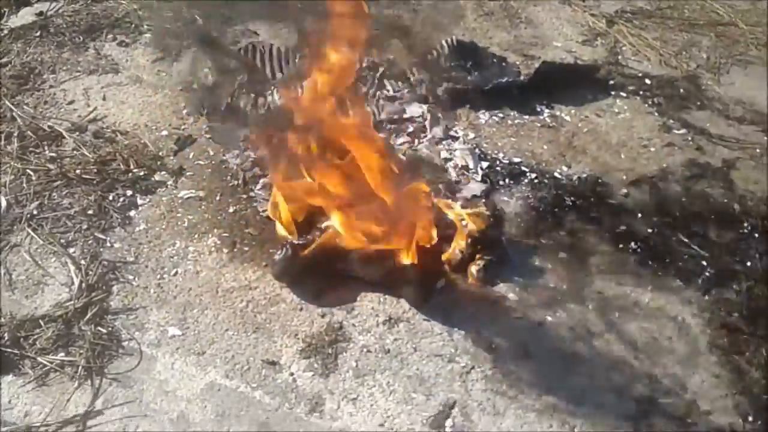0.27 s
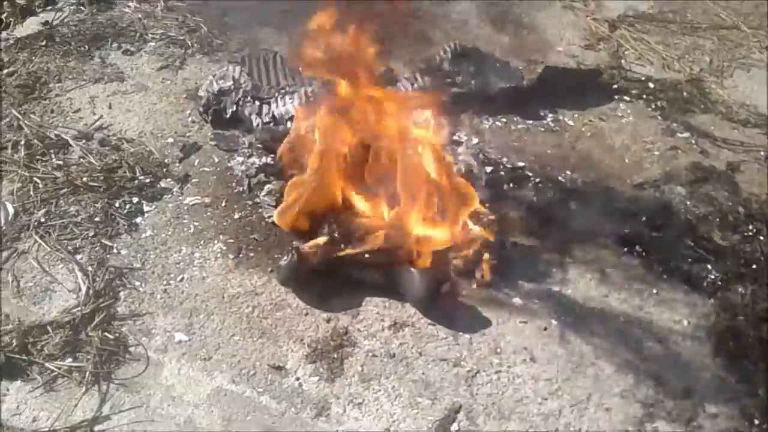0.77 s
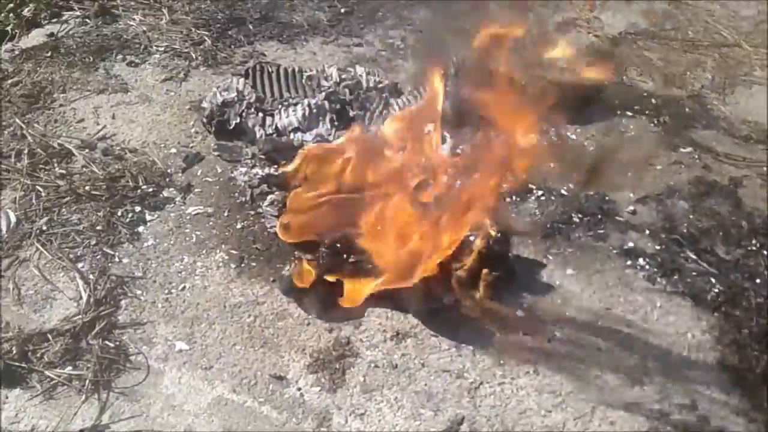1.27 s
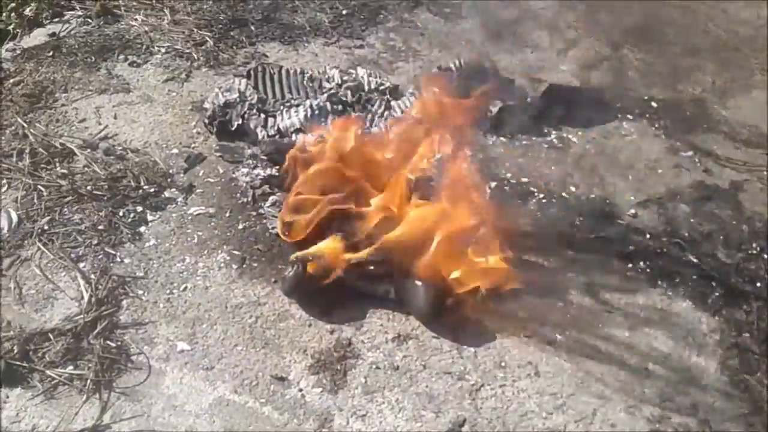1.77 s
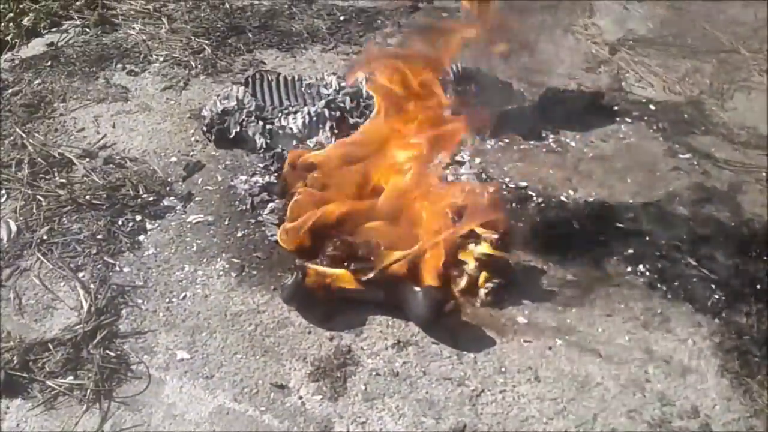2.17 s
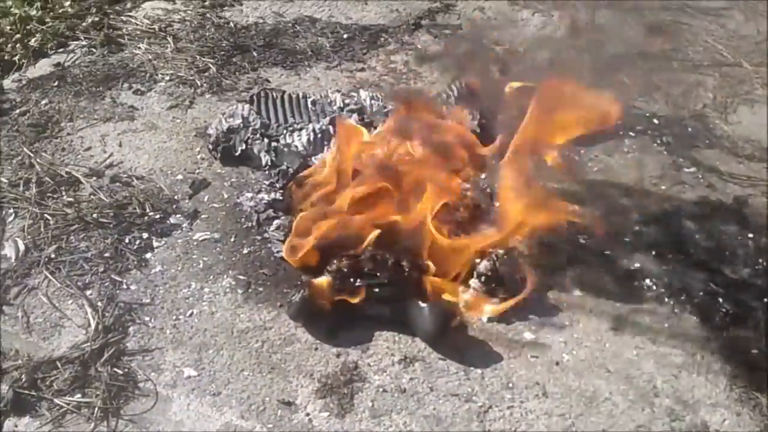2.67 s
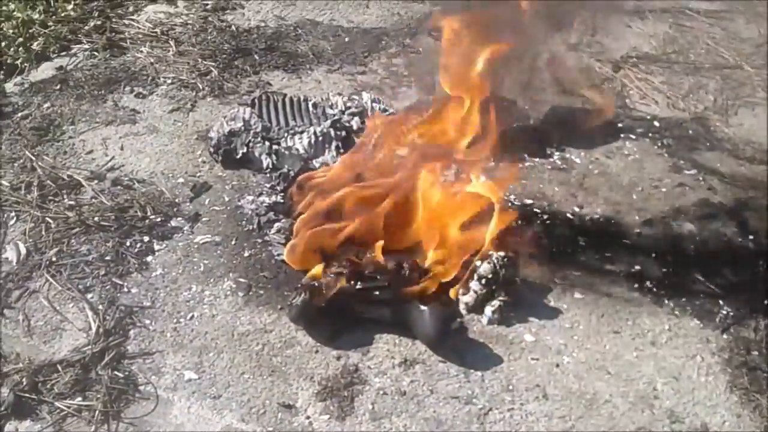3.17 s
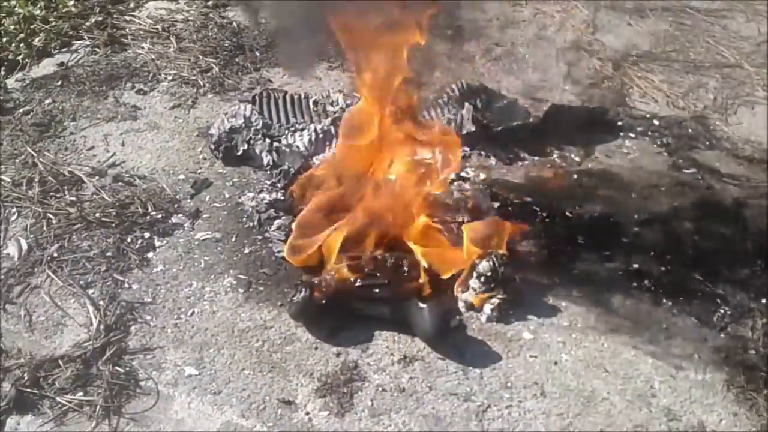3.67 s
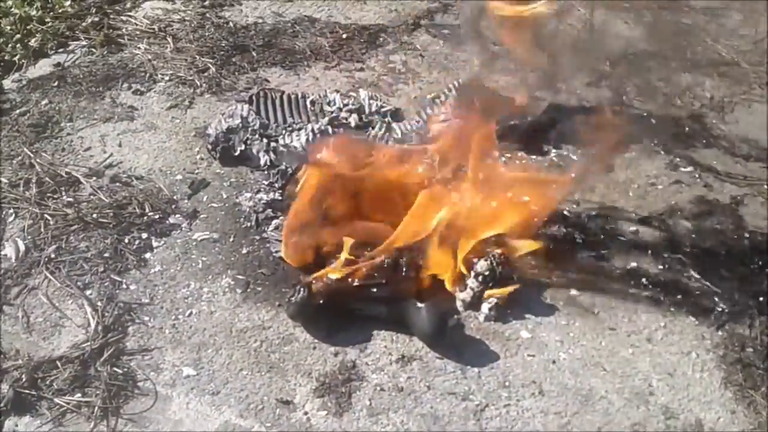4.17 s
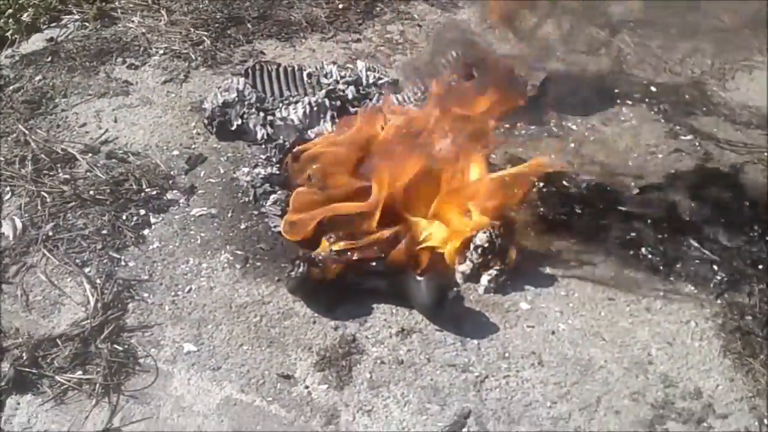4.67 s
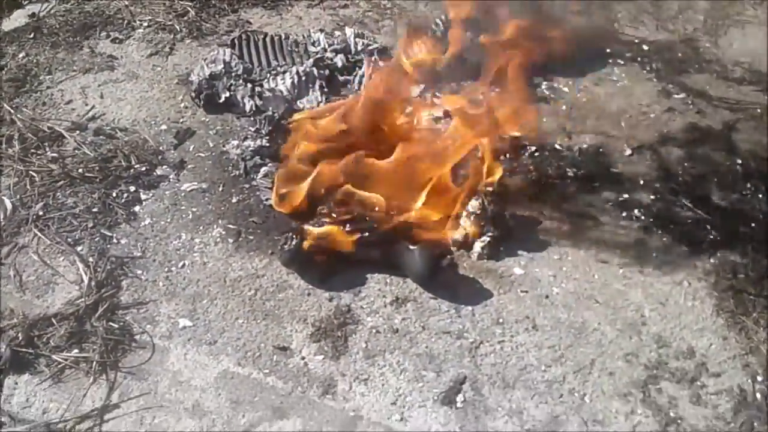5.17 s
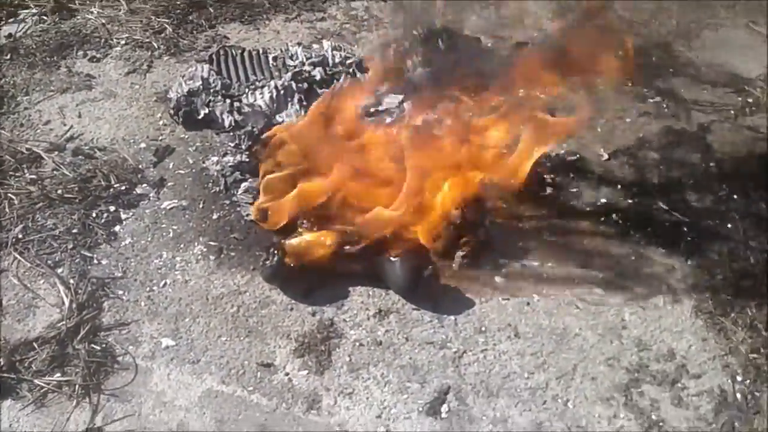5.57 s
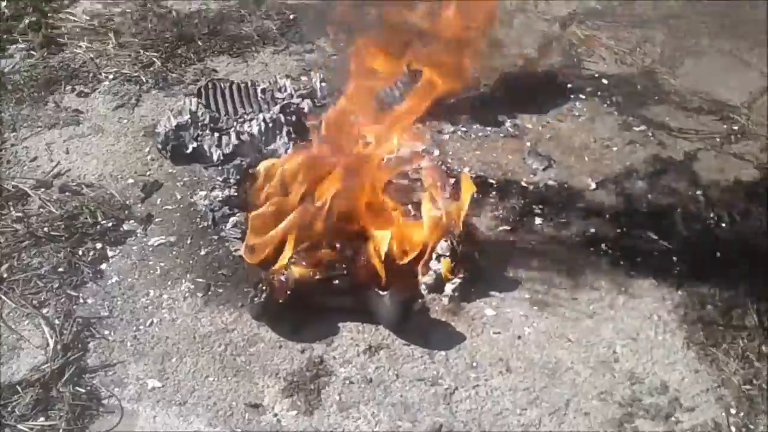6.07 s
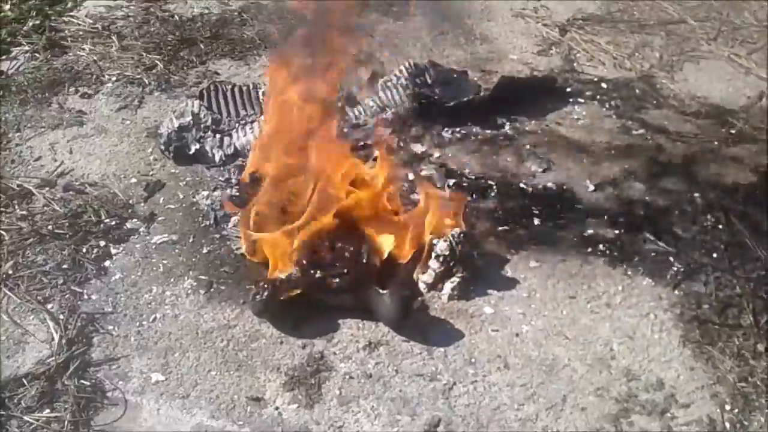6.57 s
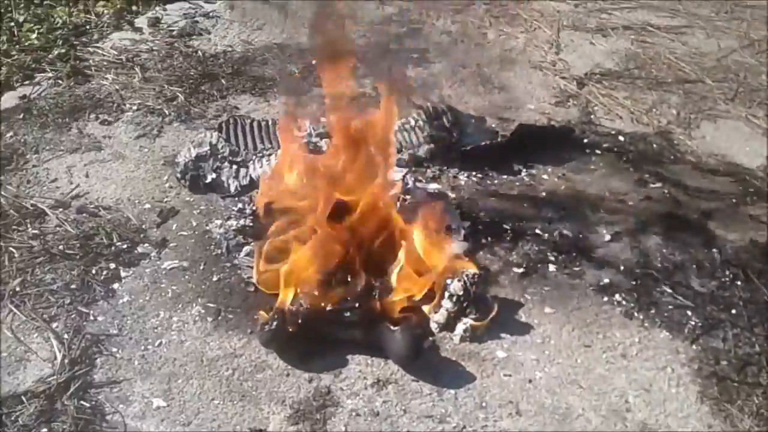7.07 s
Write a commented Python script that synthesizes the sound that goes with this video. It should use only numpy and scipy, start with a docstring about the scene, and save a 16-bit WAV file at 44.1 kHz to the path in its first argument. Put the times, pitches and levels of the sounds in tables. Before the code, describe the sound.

A small fire of paper and cardboard burns on concrete outdoors, close to the microphone and centred. Throughout, flames make a low, softly fluttering rumble with muffled patter, while faint air and a low, wavering hum of far machines sit behind; the hum's lowest notes fade. At 0 s bright ticks and fine fizz are lively, with small snaps, then thin out by 0.5 s, with a tiny high squeak. From 1 to 1.8 s it is sparse. At 1.84 s a sharp snap squeaks, and at 2.04 s one very loud crack stands out, with a dull puff. Crackling spurts at 2.6 s, a strong snap follows at 3.03 s, and fizz swells at 3.6 s. Frequent snaps continue through 4.4 s, easing around 5.5 s. Two hard pops at 6.03 s lead into the densest crackle, peaking near 6.45 s; scattered snapping and sizzling continue to 7.3 s.

```python
"""Outdoors on concrete, a small fire of paper and cardboard burns close to the listener.
Breaking fibres give showers of tiny damped ticks over a sizzle of dense random clicks, both filtered to shape;
the burn dies down, spurts as fresh edges catch, and builds again. Sharp pops are larger snaps with rustle and
knock, dull ones are tones falling in pitch, and brief squeaks are pure tones. The flames are low noise with a
fluttering level and a patter of clicks; far machines hum as slowly wavering sines in faint outdoor air."""
import sys
import numpy as np
from scipy import signal
from scipy.fft import rfft, irfft
from scipy.io import wavfile
from scipy.ndimage import uniform_filter1d

SR = 44100
rng = np.random.default_rng(int(sys.argv[2]) if len(sys.argv) > 2 else 0)


def generate_wav(signal):
    """Clip the signal to [-1, 1] and save it as 16-bit WAV at the path in sys.argv[1]."""
    frames = np.transpose(np.atleast_2d(signal))
    scaled = np.clip(frames, -1, 1) * 32767
    pcm = np.round(scaled).astype(np.int16)
    wavfile.write(sys.argv[1], SR, pcm)


N = 323253
TIME = np.arange(N) / SR

# how hard the paper burns, before each layer's trim: [t/s, crackle level/dB, sizzle level/dB]
BURN_STRENGTH = [(0.0, -55, -54.5), (0.42, -66.5, -57), (0.82, -66, -59.5), (1.12, -72, -65),
                 (1.32, -63, -64), (1.55, -75, -64), (1.9, -65, -62), (2.39, -68, -62.5),
                 (2.59, -56.5, -55.5), (2.77, -62, -57), (3.03, -57, -60), (3.38, -67.5, -62.5),
                 (3.59, -57.5, -51.5), (4.12, -55, -55), (4.55, -62, -59), (4.82, -58.5, -58),
                 (5.87, -64, -60.5), (6.07, -57.5, -55.5), (6.44, -51.5, -50.5), (6.65, -59.5, -56),
                 (7.04, -56.5, -57.5), (7.33, -60, -54.5)]


def gain_of(db):
    """Level: an amplitude ratio is ten to the power of dB / 20."""
    return 10 ** (np.asarray(db) / 20)


def evened(x):
    """Normalization: scales the mean power to 1."""
    return x / np.sqrt(np.mean(x ** 2) + 1e-20)


def curve(rows, axis):
    """Linear interpolation: one column of a timed table, at every sample."""
    rows = np.array(rows)
    return np.interp(TIME, rows[:, 0], rows[:, axis])


def add(mix, s, sound):
    """Superposition: adds a sound into the mix, in place, from time s."""
    part = mix[max(round(s * SR), 0):][:len(sound)]
    part += sound[:len(part)]


def drift(hz):
    """Low-passed noise: a slow random course of rms 1, with little variation much faster than hz."""
    spectrum = rfft(rng.standard_normal(N))
    low_pass = 1 / (1 + (np.fft.rfftfreq(N, 1 / SR) / hz) ** 4)
    return evened(irfft(spectrum * low_pass, N))


def ring(points, size=4096):
    """Minimum phase: the causal impulse response whose phase follows from its log spectrum."""
    f, db = np.transpose(points)
    hz = abs(np.fft.fftfreq(size, 1 / SR))
    log_gain = np.log(gain_of(np.interp(np.log(hz + 1), np.log(f), db)))
    return np.fft.ifft(np.exp(np.conj(signal.hilbert(log_gain)))).real


def colour(x, points):
    """Linear filtering: convolution imposes a spectrum on x; the result has rms 1."""
    return evened(signal.oaconvolve(x, ring(points))[:N])


def shower(per_s, spread_db, cap):
    """Poisson-like process: clicks of random sign and moment, most of them small and a few large."""
    size = gain_of(spread_db * np.minimum(rng.exponential(1, N), cap))
    happens = rng.random(N) < per_s / SR
    return size * rng.choice([-1, 1], N) * happens


def outdoor_air(level_db=-69):
    """Broadband ambience: stationary filtered noise, the same in both ears."""
    # spectrum of the air: [f/Hz, level/dB per Hz]
    air_spectrum = [(200, -3.5), (1500, 1), (4000, -10), (8000, -4.5), (11000, -44), (14000, -8.5),
                    (16000, -18)]
    return gain_of(level_db) * colour(rng.standard_normal(N), air_spectrum)


def wide_air(level_db=-75):
    """Interaural difference: filtered noise to be heard in opposite phase by the two ears."""
    # spectrum of the air that differs between the ears: [f/Hz, level/dB per Hz]
    wide_spectrum = [(200, -28), (300, 2.5), (2200, 5), (5000, -3), (9000, -27), (11500, -25),
                     (15000, -4.5)]
    return gain_of(level_db) * colour(rng.standard_normal(N), wide_spectrum)


def hum(waver=0.0022, waver_db=1.3):
    """Frequency and amplitude modulation: far machines hold wavering low notes; all but the highest fade."""
    # notes about which pitch and level waver: [f/Hz, rms level at the start/dB, fade/(dB/s)]
    notes = [(73, -65, 3.0), (119.5, -62, 1.0), (163, -69, 0.5), (236.7, -59.2, 0)]
    clock = np.cumsum(1 + waver * drift(hz=1.95)) / SR  # one pitch waver shared by all notes
    total = np.zeros(N)
    for hz, db, fade in notes:
        level_db = db - fade * TIME + waver_db * drift(hz=0.51)
        total += gain_of(level_db) * np.sqrt(2) * np.sin(2 * np.pi * hz * clock)
    return total


def flames(roar_db=-1, lick_db=1.5, patter_db=-65, follow=0.5, flicker_db=2.04):
    """Combustion noise: turbulent burning roars low; little pockets of gas catch with a soft patter."""
    # size of the flames, before trim and flutter: [t/s, roar level/dB]
    flame_size = [(0.05, -50.5), (0.47, -54), (0.57, -48.5), (0.66, -53), (1.48, -51.5), (1.56, -55.5),
                  (1.8, -51.5), (2.27, -56), (2.44, -53.5), (4.55, -53.5), (4.7, -56), (5.06, -52),
                  (5.3, -53.5), (5.66, -51.5), (5.87, -56), (6.15, -54), (6.6, -52.5), (7.33, -53)]
    # spectrum of the roar: [f/Hz, level/dB per Hz]
    roar_spectrum = [(15, -48), (32, -19), (48, -4), (70, 0), (120, 3.7), (200, -2.5), (300, -10),
                     (450, -14), (900, -35.5), (2500, -54.5)]
    # spectrum of the patter: [f/Hz, level/dB per Hz]
    patter_spectrum = [(100, -18.5), (350, -1.5), (700, 2), (1300, -2), (2500, -8), (5000, -9.5),
                       (10000, -24.5)]
    size_db, lick = curve(flame_size, axis=1), drift(hz=19.0)
    roar_level_db = size_db + roar_db + lick_db * lick
    roar = colour(rng.standard_normal(N), roar_spectrum) * gain_of(roar_level_db)
    patter = colour(shower(per_s=2200, spread_db=1.5, cap=3.6), patter_spectrum)
    patter_level_db = patter_db + follow * (size_db - size_db.mean()) + flicker_db * lick
    return roar + patter * gain_of(patter_level_db)


def puffs(rough=0.3, swollen_hz=110, swell_s=0.0035, size=1500):
    """Swelling source: a larger pocket of gas ignites unevenly, and its pitch falls as it swells."""
    # dull pops of gas pockets, before roughening: [t/s, peak level/dB, starting f/Hz, rise to the peak/s]
    pockets = [(1.925, -36, 1950, 0.00034), (1.9334, -48, 1800, 0.0003), (2.0441, -38, 520, 0.00036),
               (2.056, -48.5, 1100, 0.0022), (2.837, -46, 600, 0.0046), (5.068, -45, 1500, 0.0044),
               (5.582, -44.5, 347, 0.0042), (6.174, -49.5, 900, 0.0018), (7.04, -44, 2340, 0.00016)]
    out, t = np.zeros(N), np.arange(size) / SR
    for s, db, start_hz, length in pockets:
        u = t / length
        hz = swollen_hz + (start_hz - swollen_hz) * np.exp(-t / swell_s)
        tone = np.sin(2 * np.pi * np.cumsum(hz) / SR)
        add(out, s, gain_of(db) * u * np.exp(1 - u) * tone)
    return out * (1 + rough * drift(hz=400))


def squeaks(rise_s=0.0007, size=600):
    """Whistle tone: steam forced through a pinhole sounds one pitch for an instant."""
    # squeaks of steam: [t/s, peak level/dB, f/Hz]
    whistles = [(0.534, -36.5, 6970), (0.554, -44, 6750), (1.837, -25, 8380)]
    out, t = np.zeros(N), np.arange(size) / SR
    envelope = t / rise_s * np.exp(1 - t / rise_s)
    for s, db, hz in whistles:
        add(out, s, gain_of(db) * envelope * np.sin(2 * np.pi * hz * t))
    return out


def sizzle(level_db=-5.4, flicker_db=2.3, swell_db=1.7):
    """Shot noise: vapour escapes through pores in a dense, fine fizz."""
    # spectrum of the fizz: [f/Hz, level/dB per Hz]
    fizz_spectrum = [(1000, -34), (3000, -12.5), (5000, -5.8), (7000, -7), (8300, 1), (9300, -9.5),
                     (11300, -26), (14000, -29), (16000, -24)]
    pores = shower(per_s=3800, spread_db=4.5, cap=4.5)
    waver_db = flicker_db * drift(hz=90) + swell_db * drift(hz=9.5)
    return colour(pores, fizz_spectrum) * gain_of(curve(BURN_STRENGTH, axis=2) + level_db + waver_db)


def snap(hz, rustle_db=-11, knock_db=-17, fibre_s=0.00011, rustle_s=0.0012, shudder=0.12, low_share=0.63, size=400):
    """Damped oscillation: a breaking fibre radiates little below hz; the torn edge rustles, the sheet knocks."""
    # spectrum of the snap: [f/Hz, level/dB per Hz]
    snap_spectrum = [(300, -39), (2800, -15.5), (3700, -7), (4800, 0), (6800, -3.5), (8200, -1),
                     (9300, -8.5), (11300, -24), (13500, -15.5), (16000, -17.5)]
    # spectrum of the dull knock of a sheet: [f/Hz, level/dB per Hz]
    knock_spectrum = [(100, -10), (400, -5), (1200, -2.5), (1900, -4), (2600, -3), (4000, -5),
                      (8000, -22.5)]
    t = np.arange(size) / SR
    swing = np.exp(-t / fibre_s) * np.cos(2 * np.pi * hz * t)
    low_cut = signal.butter(4, low_share * hz, "high", fs=SR, output="sos")
    tick = signal.sosfilt(low_cut, np.convolve(swing, ring(snap_spectrum, size=512))[:size])

    rustle = rng.standard_normal(size) * np.exp(-t / rustle_s) * (t > .0003)
    flat_rustle = irfft(np.exp(1j * np.angle(rfft(rustle))), size)  # every pitch equally strong
    first_half = t < t.mean()
    tear = np.convolve(flat_rustle * first_half, tick)[:size]
    sound = evened(tick) + gain_of(rustle_db) * evened(tear)

    blow = (t == 0) + shudder * rustle
    knock = np.convolve(ring(knock_spectrum, size=512), blow)[:size]
    one_ms = np.sqrt(.001 * SR / size)  # refers the rms to 1 ms
    return (evened(sound) + gain_of(knock_db) * evened(knock)) * one_ms


def crackle(level_db=-4.0, knock_db=-15, low_hz=3700, high_hz=8900, count=28):
    """Granular emission: tiny fibres of many pitches and weights snap as the flame front reaches them."""
    clicks = shower(per_s=400, spread_db=4.6, cap=2.7)
    fibre = rng.integers(0, count, N)
    weight_db = rng.normal(knock_db, 5, count)  # knock of each kind of fibre
    grains = np.zeros(N)
    for k, hz in enumerate(np.linspace(low_hz, high_hz, count)):
        grains += signal.oaconvolve(clicks * (fibre == k), snap(hz, knock_db=weight_db[k]))[:N]
    power = uniform_filter1d(grains ** 2, size=6000)
    steady = grains / np.sqrt(abs(power) + 1e-12)  # the fuel gives off its energy at a steady pace
    return gain_of(curve(BURN_STRENGTH, axis=1) + level_db) * steady


def pops(scatter_db=-29, scatter_s=0.0077, size=2000):
    """Impulsive radiation and diffuse scattering: large snaps, with a faint tail from the rough ground."""
    # sharp pops: [t/s, level without knock/dB rms over 1 ms, f/Hz, rustle of the torn edge/dB re the snap,
    # knock of the sheet/dB re snap and rustle]; a row that ends at f has the usual rustle and knock
    large_snaps = [(0.0294, -42, 5300), (0.045, -30.5, 6200, 3, -12.5), (0.0517, -44, 6700),
                   (0.1248, -39.5, 3850), (0.186, -44, 6700), (0.2129, -39, 7000), (0.244, -42, 5650),
                   (0.2676, -41, 7900), (0.3193, -41.5, 5640, -9, -5.5), (0.3406, -43, 8000),
                   (0.4947, -45, 6000, 1, -7), (0.703, -48, 7500), (0.761, -39, 6700, 5, -38),
                   (0.798, -47, 8000), (1.129, -51, 6000, 0, 1), (1.2962, -47.5, 4950), (1.3075, -48, 7500),
                   (1.3534, -49, 6000), (1.5236, -45, 8550), (1.6094, -50, 8200), (1.7861, -46.5, 6200),
                   (1.8371, -25, 6870, 3, -20), (1.8951, -47, 6800), (1.9038, -46, 6600),
                   (1.9081, -48, 7100), (1.9996, -47, 7500), (2.0442, -11, 6700, -11, -16.5),
                   (2.0918, -44, 6300), (2.142, -42, 5350), (2.1594, -47, 5900), (2.299, -46, 7000),
                   (2.338, -47, 5700), (2.445, -35, 7700), (2.4857, -46, 6500), (2.5663, -38, 5100),
                   (2.5805, -40, 6200), (2.6046, -44.5, 6000), (2.6224, -44, 6000), (2.693, -41.5, 6740),
                   (2.8795, -44, 5700), (2.8852, -37, 5950, -11, -9), (2.9271, -45, 6400),
                   (2.9623, -40.5, 4900), (2.992, -36.5, 7860), (3.0167, -43, 7500, -7, -2),
                   (3.0322, -24, 6800, -8, -35), (3.085, -42, 6300), (3.182, -40.5, 6700, 1, -8.5),
                   (3.2196, -32.5, 8000, 4, -19), (3.4311, -46, 5500), (3.4378, -40.5, 5200),
                   (3.4567, -41, 5500), (3.488, -45, 7900), (3.527, -40, 7950), (3.5366, -44, 6500),
                   (3.5851, -38.5, 5670), (3.6225, -42, 6300), (3.6926, -36, 7750), (3.7012, -43, 7400),
                   (3.7573, -42, 7200), (3.8625, -43, 6800), (3.8828, -41, 6850), (3.944, -38, 7750),
                   (3.9701, -39.5, 5400), (3.9806, -31.5, 6300, -15, -9.5), (4.0342, -38, 6050),
                   (4.0551, -42, 6000), (4.0615, -43, 6200), (4.1218, -38, 5800), (4.1397, -32.5, 5870),
                   (4.1619, -39, 6100), (4.2299, -39.5, 5700), (4.2799, -43.5, 5500), (4.3037, -36.5, 6200),
                   (4.3566, -43.5, 5650), (4.392, -44, 6800), (4.487, -43.5, 7200), (4.5739, -44.5, 3800),
                   (4.689, -42, 5450), (4.7752, -36, 5430), (4.805, -44, 7100), (4.843, -46, 6400),
                   (4.8512, -42, 5450), (5.0399, -41, 5550), (5.109, -42.5, 6100, -12, -7),
                   (5.1292, -45, 5800), (5.1422, -45, 7800), (5.1588, -38, 3800, -14, -10),
                   (5.2068, -33.5, 5160), (5.4673, -45, 7100), (5.7252, -40.5, 5950), (5.7533, -45, 7700),
                   (5.8497, -41.5, 8600, 0, -26), (5.9627, -37, 6100), (6.022, -24, 4500, -15, -16.5),
                   (6.0358, -26.5, 6140, -10, -11.5), (6.1205, -43, 6100), (6.1263, -38.5, 5500, 0, -18),
                   (6.1482, -37.5, 5800), (6.2183, -39, 7400), (6.2325, -40, 7200), (6.2408, -35, 6240),
                   (6.2633, -37, 5500), (6.2821, -43, 6500), (6.3183, -30, 5900), (6.3274, -42, 6900),
                   (6.3648, -27.5, 7440, -15, -22), (6.385, -35.5, 6900), (6.4078, -41, 6500),
                   (6.4241, -41, 6500), (6.4292, -41, 6400), (6.443, -42, 6400), (6.4531, -29.5, 6950),
                   (6.4714, -37, 7100), (6.4872, -42, 6500), (6.5329, -32, 6200, 5, -14.5),
                   (6.5972, -40, 6450), (6.668, -43, 7000), (6.7291, -38.5, 6300), (6.7819, -36, 6900),
                   (6.8234, -37, 6050), (6.9133, -43, 7900), (6.9198, -42, 7300), (6.938, -39, 4850),
                   (6.9833, -37.5, 6500), (7.0368, -38.5, 3800, -13, -8.5), (7.0824, -37, 5850),
                   (7.1043, -40.5, 7250), (7.2522, -44, 7600), (7.307, -44, 6800)]
    out, t = np.zeros(N), np.arange(size) / SR
    for s, db, *timbre in large_snaps:
        add(out, s - .0001, gain_of(db) * snap(*timbre))
    ground = rng.standard_normal(size) * np.exp(-t / scatter_s)
    tail = signal.oaconvolve(out, ground / np.linalg.norm(ground))[:N]
    return out + gain_of(scatter_db) * tail


def scene(spill_db=-27):
    """Mid-side superposition: the fire is dead centre; a trace of its crackle comes back from the sides."""
    paper = crackle() + sizzle()
    centre = outdoor_air() + hum() + flames() + puffs() + squeaks() + paper + pops()
    side = wide_air()
    add(side, .004, gain_of(spill_db) * paper)
    return np.array([centre + side, centre - side])


def record(dry):
    """Band limitation: a linear-phase low-pass removes what lies above its edge."""
    edge = signal.firwin(401, 16100, window=("kaiser", 9), fs=SR)  # cutoff in Hz
    return signal.oaconvolve(dry, edge[None], "same", axes=1)


dry = scene()
out = record(dry)
generate_wav(out)
```